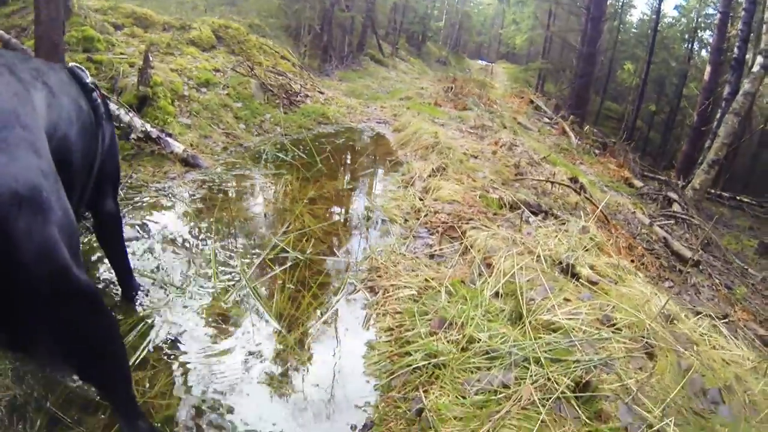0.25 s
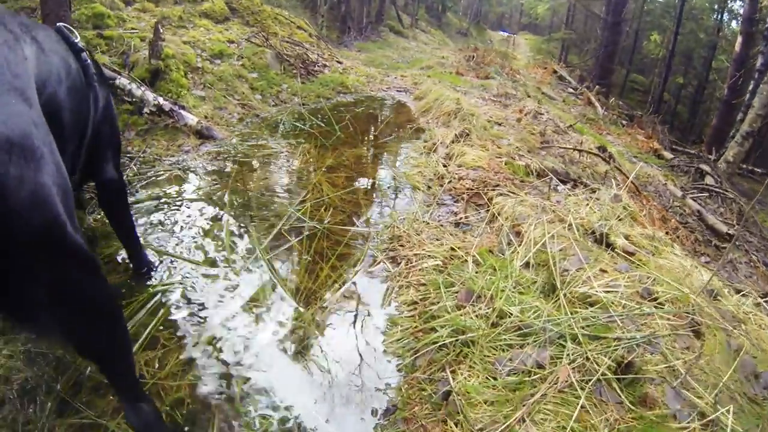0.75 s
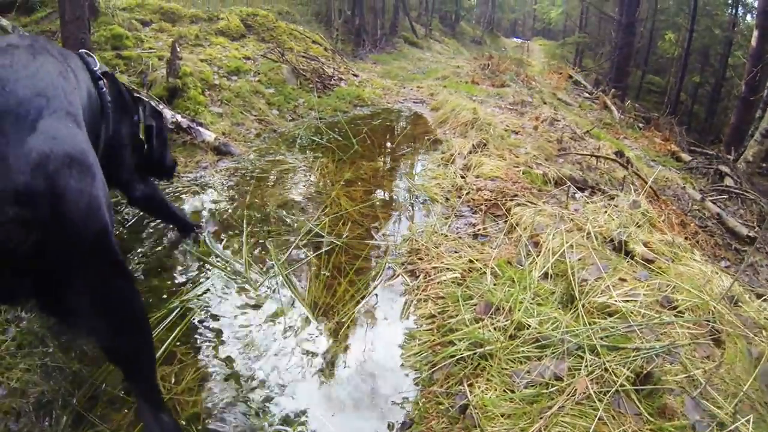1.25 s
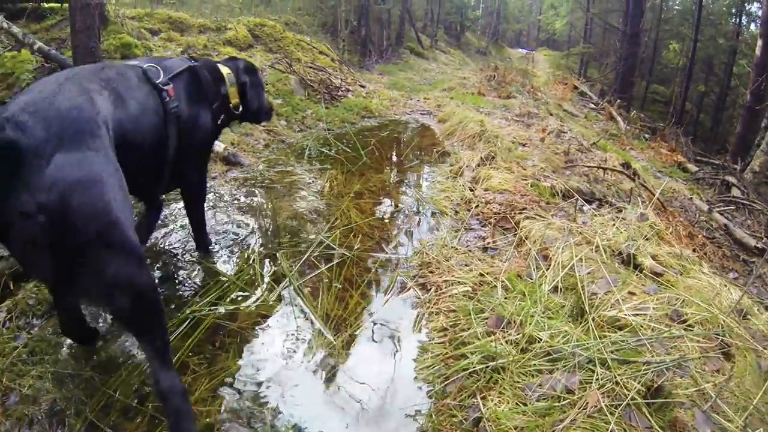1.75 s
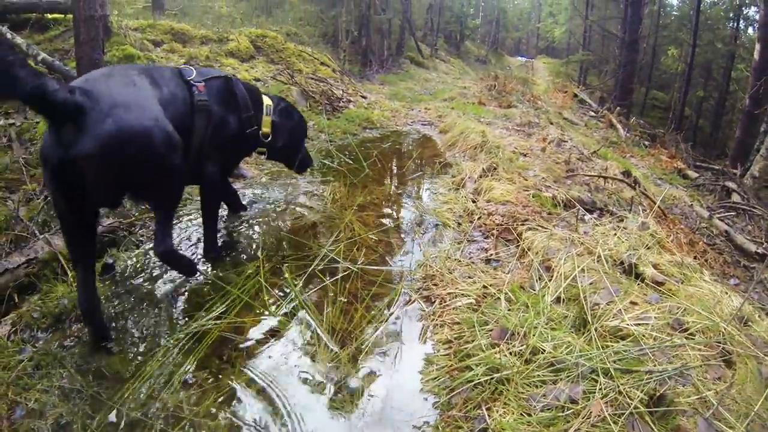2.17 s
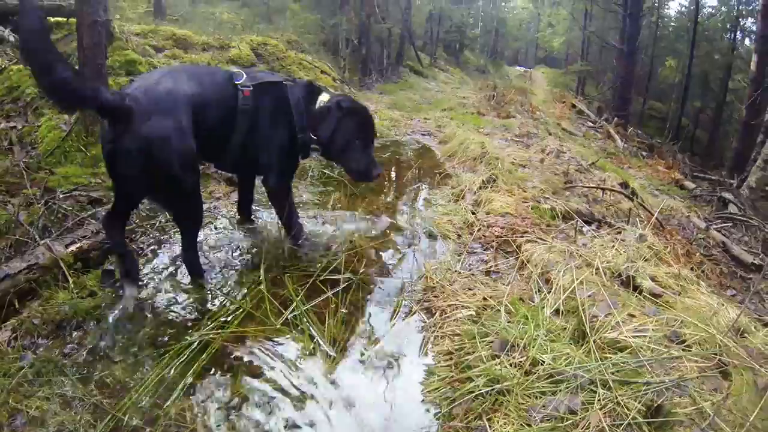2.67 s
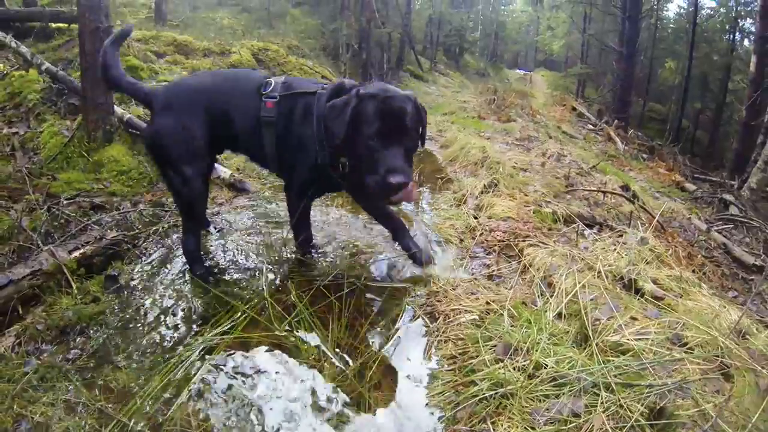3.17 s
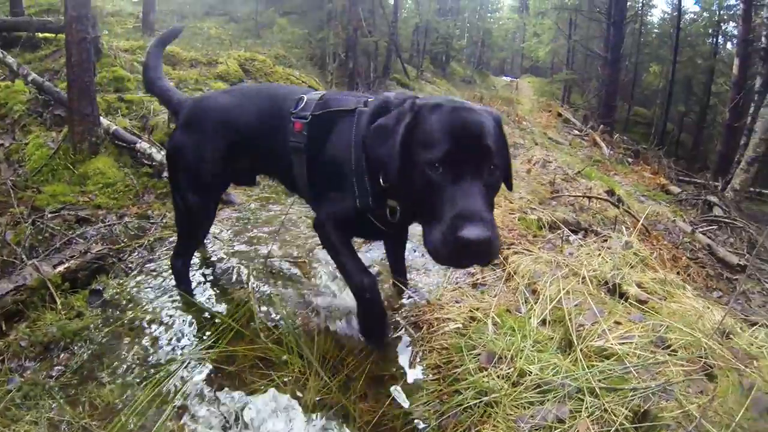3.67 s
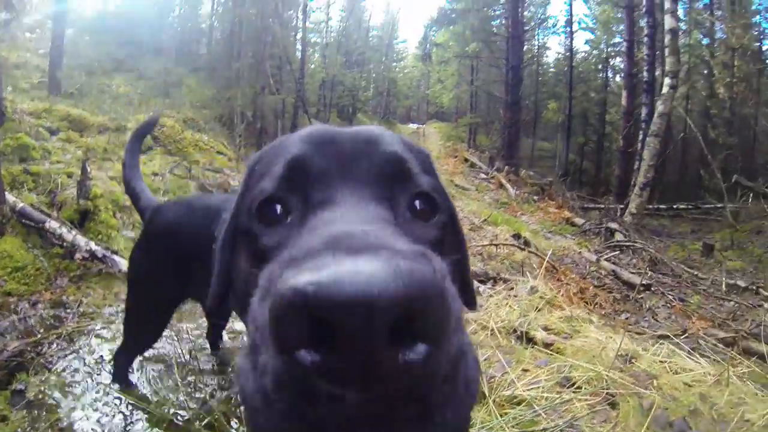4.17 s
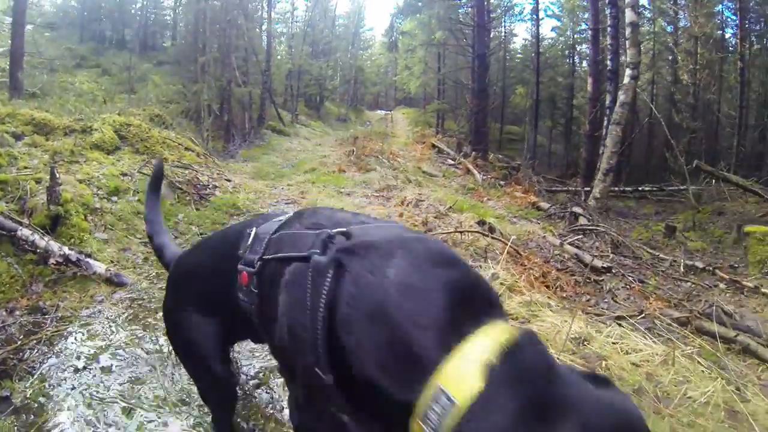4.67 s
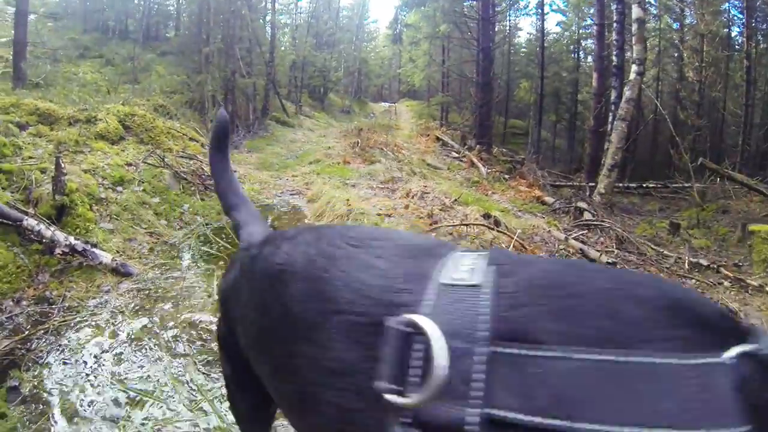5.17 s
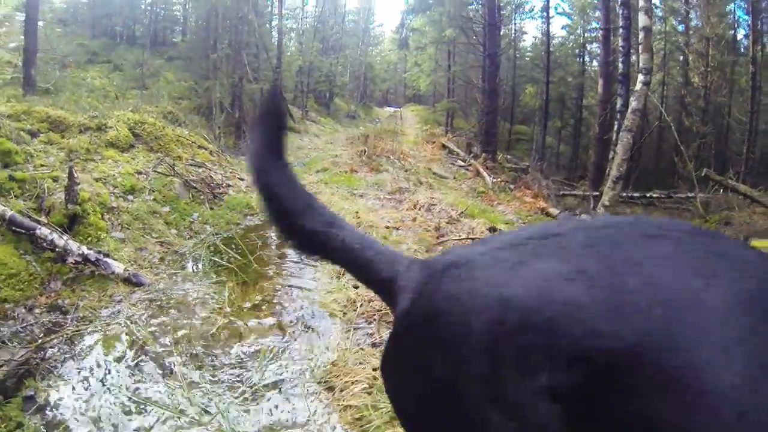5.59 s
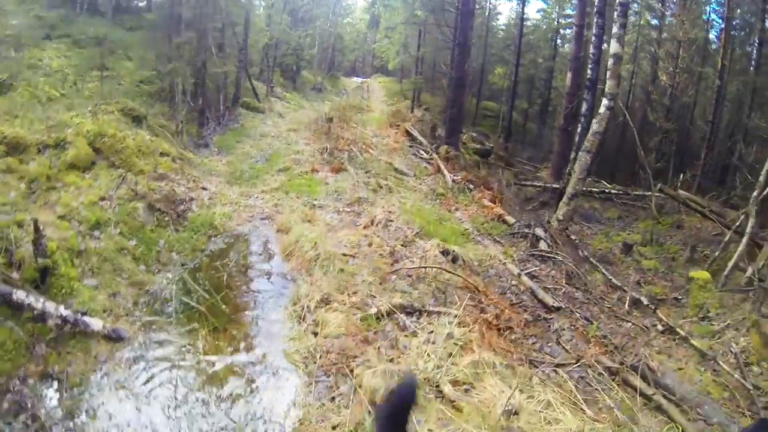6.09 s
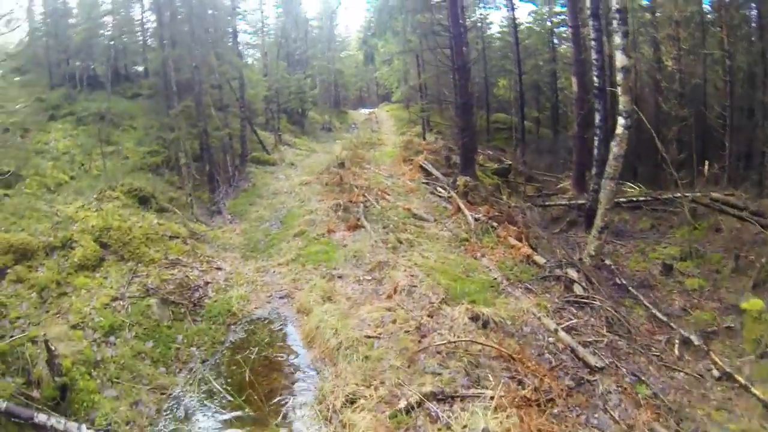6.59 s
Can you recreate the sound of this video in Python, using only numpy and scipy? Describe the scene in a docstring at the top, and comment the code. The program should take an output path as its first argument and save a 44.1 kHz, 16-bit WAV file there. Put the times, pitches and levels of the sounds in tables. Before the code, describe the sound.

Heard from inside a hand-held plastic camera case outdoors among trees: grip rumble and dull bumps open, then paws stir shallow water in irregular, gentle sloshes with gurgles, tinkling drips and brief sprays. Steps continue as the dog comes near and passes, with more case clicks. After a strong plastic snap the water settles, leaving mostly quiet hiss and a faint wavering whine.

```python
"""A dog wades through a shallow forest puddle, heard from inside a hand-held camera's plastic case.
Legs, bubbles and short crackling bursts are made of random drops and ringing bubbles; trees add a faint tail.
Resonances of the case wall colour the slosh. The hand on the grip adds rumble, soft bumps and sharp ticks.
Under it all lie a steady filtered-noise hiss and a thin sine whine whose pitch wavers."""
import sys
import numpy as np
from scipy import signal
from scipy.fft import rfft, irfft, next_fast_len
from scipy.io import wavfile
from scipy.ndimage import map_coordinates

SR = 44100
rng = np.random.default_rng(int(sys.argv[2]) if len(sys.argv) > 2 else 0)


def to_wav(s):
    """Save 16-bit WAV."""
    ch = np.atleast_2d(s).T  # columns
    pcm = np.round(np.clip(ch, -1, 1) * 32767)  # PCM
    wavfile.write(sys.argv[1], SR, pcm.astype(np.int16))


N = 302085  # length in samples

# All table levels are relative: the functions below may shift or rescale them.
# the hand shifting on the grip: (time [s], rumble level [dB])
HAND_SHIFTS = [(0.0, -42), (0.31, -52), (0.46, -48), (0.85, -52.5), (1.28, -62.5), (1.48, -51),
               (1.62, -60.5), (2.85, -59), (3.15, -62.5), (3.79, -58), (3.86, -48.5), (4.5, -50.5),
               (4.66, -55.5), (4.8, -51.5), (5.38, -60), (5.6, -52), (6.0, -57), (6.84, -61)]
# large bubbles that the paws trap: (time [s], level [dB], pitch [Hz])
LARGE_BUBBLES = [(0.08, -54, 2800), (0.814, -51.5, 1570), (0.848, -44.5, 1590), (0.8663, -35, 1660),
                 (0.9691, -55.5, 1430), (1.208, -53.5, 1500), (1.245, -51.5, 1416), (1.352, -46, 1527),
                 (1.781, -55.5, 2650), (1.8257, -54.5, 1417), (1.8716, -49.5, 1473), (2.063, -46, 2941),
                 (2.068, -48.5, 2400), (2.08, -47, 1450), (2.1167, -52, 1790), (2.442, -48, 1340),
                 (2.451, -49.5, 1465), (2.4786, -54, 3120), (2.57, -48.5, 1544), (2.595, -51, 1560),
                 (2.6272, -47, 1292), (2.641, -47, 1484), (2.6633, -48, 1550), (2.723, -54.5, 2440),
                 (2.7297, -52, 3460), (2.7885, -53.5, 1530), (3.1392, -57, 1390), (3.244, -55, 3170),
                 (3.6696, -52.5, 1350), (3.85, -44, 1460), (3.8842, -48, 3510), (4.1367, -50, 1460),
                 (4.205, -56, 1518), (4.6028, -49.5, 2330), (4.627, -50, 2590), (4.655, -53, 2870),
                 (4.7024, -59, 2800), (4.7908, -51.5, 1780), (4.846, -43.5, 1445), (4.954, -52.5, 1870),
                 (5.0232, -51.5, 2170), (5.0723, -54, 1480), (5.1616, -52, 2890), (5.558, -46.5, 1406),
                 (5.621, -50, 1491), (5.647, -52.5, 2200)]
# short bursts of spray and sharp crackles: (time [s], level [dB], brightness [dB])
SPRAY_AND_CRACKLES = [(0.082, -50, -37), (0.7846, -53, -28), (0.8228, -45.5, -27), (0.847, -42.5, -42),
                      (0.862, -40, -48), (0.8714, -51, -29), (0.888, -56, -22), (0.915, -52.5, -25),
                      (0.966, -50, -41), (1.353, -49, -28), (1.359, -45, -22), (1.5317, -50, -16),
                      (2.0486, -50.5, -14), (2.0596, -48.5, -12), (2.6195, -50, -17), (2.659, -49.5, -29),
                      (2.9794, -49, -15), (3.321, -48, -18), (3.397, -45, -30), (3.868, -42.5, -11),
                      (3.896, -47.5, -13), (3.9816, -45, -5), (3.997, -50, -13), (4.594, -55, -8),
                      (4.644, -53, -6), (4.7864, -43, -9), (4.868, -50, -16), (5.015, -55, 0),
                      (5.08, -46.5, -20), (5.155, -57, -18), (5.692, -50, -14)]
# soft knocks through the grip: (time [s], level [dB], pitch [Hz], sway of the mount [dB])
SOFT_KNOCKS = [(0.0238, -32.5, 174, -20.5), (0.139, -35, 216, -57), (0.1528, -31, 228, -24),
               (0.385, -26.5, 158, -27), (0.4687, -42.5, 106, -29), (0.6313, -26, 220, -23),
               (0.6784, -29.5, 140, -33), (1.547, -41.5, 164, -54), (1.5612, -38, 163, -44),
               (1.723, -32.5, 178, -33), (2.0187, -33, 183, -30.5), (2.0345, -30, 202, -50),
               (2.05, -28, 205, -28.5), (2.24, -49, 183, -33.5), (2.4277, -35.5, 144, -46),
               (3.3886, -28.5, 178, -58), (3.401, -23.5, 213, -34), (3.418, -26.5, 223, -26.5),
               (3.837, -23.5, 217, -45), (3.866, -35.5, 225, -37), (4.055, -40.5, 169, -33),
               (4.412, -36.5, 185, -40), (4.496, -38, 147, -33), (4.7423, -36.5, 148, -26),
               (4.807, -36.5, 136, -25.5), (4.8458, -37.5, 144, -40.5), (4.9401, -31.5, 203, -22.5),
               (5.0806, -37, 166, -23), (5.0872, -36, 229, -26), (5.1347, -37.5, 146, -30),
               (5.1816, -45, 101, -30), (5.4321, -30.5, 228, -54), (5.44, -35.5, 170, -26.5),
               (5.5136, -33.5, 131, -25.5), (5.5299, -37.5, 250, -54), (5.543, -35.5, 144, -33),
               (5.699, -39.5, 139, -36), (5.7635, -42, 204, -33.5), (6.2008, -39.5, 222, -67),
               (6.3789, -43, 177, -56), (6.6795, -38.5, 120, -37)]
# the case ticks in its mount: (time [s], level [dB], treble [dB], pitch [Hz])
CASE_TICKS = [(0.0245, -48, -4.5, 1570), (0.138, -43.5, -22, 1390), (0.1524, -43, -18, 1350),
              (0.633, -41, -8, 1380), (0.679, -48, -5, 1490), (0.7408, -24, -4, 1470),
              (1.717, -43, -7, 1340), (2.0316, -30.5, -15.5, 1370), (3.386, -36.5, -23, 1360),
              (3.3976, -25, -48, 1350), (3.4015, -25, -5, 1470), (3.417, -50, -16, 1442),
              (3.8342, -42, -11, 1380), (3.866, -31.5, -9.5, 1490), (4.0566, -44.5, -27, 1457),
              (4.1824, -40.5, -12, 1500), (4.3943, -42, -19, 1550), (4.453, -41.5, -23, 1580),
              (4.9388, -44.5, -11, 1544), (5.0853, -42, -10, 1460), (5.43, -36.5, -27, 1515),
              (5.4378, -39.5, -10.5, 1490), (5.505, -50, -19, 1479), (5.5283, -39, -29, 1510),
              (5.5696, -38.5, -11, 1550), (5.707, -36.5, -8.5, 1550), (5.7608, -40, -8, 1540),
              (5.8677, -13, -2.5, 1498), (6.2, -38.5, -13, 1370)]
# tone of the struck case: (frequency [Hz], level [dB])
CASE_TONE = [(60, -46), (350, -17.5), (700, -17.5), (1050, -10.5), (1280, 2), (1550, 1.5), (1950, -6.5),
             (2270, -14), (2750, -10), (3150, -10), (3450, -4.5), (4000, -18.5), (5100, -53), (8200, -38.5),
             (11000, -67)]
# wall resonances that pass the water's sound: (frequency [Hz], width [Hz], level [dB])
WALL_RESONANCES = [(1410, 200, 7), (1567, 148, 6), (2140, 186, -5.5)]
# fizz of stirred water: (frequency [Hz], level per Hz [dB])
FIZZ_TONE = [(900, -31.5), (1800, -2.5), (2300, -4.5), (3200, 3), (4200, -10), (6000, -6), (8000, -8),
             (11000, -26), (15000, -30)]
# fine spray and crackle: (frequency [Hz], level per Hz [dB])
SPLASH_TONE = [(700, -7.5), (1500, -1.5), (2200, -2.5), (3500, -1.5), (5500, 0), (7500, -4), (9000, -9),
               (12000, -14.5), (15000, -14.5)]
# rubbing on the grip: (frequency [Hz], level per Hz [dB])
RUB_TONE = [(10, -3.5), (27, 3), (60, 2.5), (110, -7), (200, -18.5), (350, -26), (700, -31), (2000, -69)]
# the steady hiss: (frequency [Hz], level per Hz [dB])
HISS_TONE = [(120, -32), (200, -2.5), (249, -5.5), (320, -5.5), (391, -7), (698, -10), (1270, -13),
             (1420, -9), (1790, -14.5), (3140, -14.5), (4280, -18.5), (11800, -29.5), (13600, -25),
             (15200, -34)]
# a leg sweeps through the water: (time [s], length [s], slosh level [dB], fizz level [dB])
LEG_STROKES = [(0.057, .46, -69.5, -79), (0.771, .11, -62, -67), (0.888, .07, -68.5, -72),
               (1.189, .07, -64, -75), (1.327, .04, -61, -70), (1.474, .07, -68, -76.5),
               (1.762, .11, -66, -72), (2.037, .10, -64.5, -69), (2.323, .07, -70, -76),
               (2.417, .10, -60.5, -70.5), (2.553, .12, -63.5, -68.5), (2.697, .09, -66.5, -69.5),
               (3.039, .13, -65, -73), (3.223, .11, -64.5, -70), (3.627, .08, -62, -67),
               (3.75, .09, -68, -71), (3.852, .06, -64.5, -62), (3.929, .15, -66, -70.5),
               (4.107, .12, -60.5, -68), (4.271, .24, -68, -72), (4.587, .13, -69, -67),
               (4.759, .12, -65, -70.5), (4.931, .15, -68, -69.5), (5.103, .08, -78.5, -69),
               (5.297, .04, -72.5, -71.5), (5.552, .17, -66, -68), (5.738, .17, -68, -68.5),
               (5.956, .15, -70, -72.5), (6.476, .20, -74, -76.5)]
# a small nudge of the fingers: (frequency [Hz], level per Hz [dB])
NUDGE_TONE = [(10, -3), (30, 0.5), (70, 0.5), (130, -3.5), (220, -12), (380, -26.5), (700, -43.5),
              (2000, -89)]

HISS_DB = -67.5
LOW_HZ, TOP_HZ = 15, 15200  # band limits of the camera
STROKE_ATTACK_S, STROKE_FALL_DB_PER_S = .018, 330
RIPPLE_SLOSH_DB, RIPPLE_FIZZ_DB = -79.5, -83  # the puddle between strokes
BURST_ATTACK_S, BURST_T60_S = 0.0042, 0.039  # T60: time to fall by 60 dB


def amp(db):
    """Turn decibels into gain."""
    return 10 ** (np.asarray(db) / 20)


def unit(x):
    """Scale a sound to an average (rms) strength of 1."""
    return x / np.sqrt(np.mean(x ** 2) + 1e-20)


def along(points, hz):
    """Read a value between (Hz, value) points, spaced by the logarithm of frequency."""
    f, v = np.transpose(points)
    return np.interp(np.log(hz + 1), np.log(f + 1), v)


def wobble(rate):
    """A smooth random curve built from this many random points a second."""
    knots = rng.standard_normal(int(N * rate / SR) + 4)
    return map_coordinates(knots, [np.arange(N) * rate / SR])


def filtered(x, response):
    """Multiply each frequency of x by a response."""
    m = next_fast_len(N + SR // 2)  # spare room keeps the end from wrapping round to the start
    return irfft(rfft(x, m) * response(np.fft.rfftfreq(m, 1 / SR)), m)[:N]


def impulse(db_of, size=4096):
    """A click with the given dB at each frequency, with its energy as early as possible."""
    cepstrum = irfft(np.log(amp(db_of(np.fft.rfftfreq(size, 1 / SR))) + 1e-6))
    # fold the time-reversed half forward, so that nothing sounds before the click
    cepstrum[1:size // 2] *= 2
    cepstrum[size // 2 + 1:] = 0
    return irfft(np.exp(rfft(cepstrum)))


def coloured(x, spectrum):
    """Give x a tone colour with a filter that keeps the power of white noise."""
    h = impulse(lambda hz: along(spectrum, hz))
    return signal.fftconvolve(x, h / np.linalg.norm(h))[:N]


def add(track, s, sound):
    """Mix a sound into the track at time s."""
    i = max(0, round(s * SR))
    track[i:i + len(sound)] += sound[:max(0, N - i)]


def droplets(rate, spread_db):
    """Random clicks, about rate a second, many small and a few large, scaled to rms 1."""
    size = amp(spread_db * np.minimum(rng.exponential(size=N), 4))
    hits = rng.random(N) < rate / SR
    return unit(hits * size * rng.choice([-1, 1], N))


def wall(x):
    """Pass x through the case wall, which rings at its resonances."""
    def response(f):
        total = 0
        for k, (centre, width, db) in enumerate(WALL_RESONANCES):
            band = 1j * f * width / (centre * centre - f * f + 1j * f * width)
            total = total + (-1) ** k * amp(db) * band  # neighbours have opposite signs
        return total
    return filtered(x, response)


def bubble(t, hz, cycles, rise, attack):
    """A trapped bubble rings, falling 60 dB in some cycles; its pitch rises as it nears the surface."""
    age = t * hz / cycles
    phase = 2 * np.pi * hz * t * (1 + rise * (np.minimum(age, 1) - .3))
    return np.sin(phase) * amp(-60 * age) * (1 - np.exp(-t / attack))


def trickle(flow_db, count, centre_hz, spread, cycles, rise=0.22, size_db=4.5, attack=0.00021):
    """Scatter many small bubbles; livelier water makes more and louder ones."""
    flow = amp(flow_db)
    out, t = np.zeros(N), np.arange(SR // 25) / SR
    # strong flow takes up more of the running total, so more random picks land there
    when = np.minimum(np.searchsorted(np.cumsum(flow) / flow.sum(), rng.random(count)), N - 1)
    for i, (pitch, life, size) in zip(when, np.clip(rng.standard_normal((count, 3)), -2, 2)):
        hz = centre_hz * np.exp(spread * pitch)
        gain = flow[i] * amp(size_db * size + .5 * along(FIZZ_TONE, hz))
        add(out, i / SR, gain * bubble(t, hz, cycles * np.exp(0.23 * life), rise, attack))
    return out


def stirring():
    """Slosh and fizz in dB: each stroke swells, holds while the leg moves, and settles into ripples."""
    age = np.arange(SR) / SR
    power = np.outer(amp([RIPPLE_SLOSH_DB, RIPPLE_FIZZ_DB]) ** 2, np.ones(N))
    for s, length, slosh_db, fizz_db in LEG_STROKES:
        fall = amp(-STROKE_FALL_DB_PER_S * np.maximum(age - length, 0))
        shape = np.minimum(age / STROKE_ATTACK_S, 1) * fall
        add(power[0], s, (amp(slosh_db) * shape) ** 2)
        add(power[1], s, (amp(fizz_db) * shape) ** 2)
    return 10 * np.log10(power)


def wash(slosh_db=-5, fizz_db=-8.5, lap_db=4, gurgle_db=15.0, tinkle_db=7, drip_db=5.0):
    """Legs stir the water: lapping tiny drops, lower gurgles, high tinkling bubbles and drips off the fur."""
    slosh, fizz = stirring()
    laps = lap_db * wobble(35)
    body = amp(slosh + slosh_db + laps) * unit(wall(droplets(rate=900, spread_db=4.5)))
    top = amp(fizz + fizz_db + laps) * unit(coloured(droplets(rate=4000, spread_db=10.5), FIZZ_TONE))
    gurgle = trickle(slosh + gurgle_db, count=250, centre_hz=1490, spread=0.061, cycles=27,
                     rise=0.12, attack=0.0018)
    tinkle = trickle(fizz + tinkle_db, count=1000, centre_hz=3305, spread=0.45, cycles=49, rise=0.1)
    drips = trickle(fizz + drip_db, count=85, centre_hz=2780, spread=0.207, cycles=68,
                    rise=0.088, size_db=5.0)
    return body + top + gurgle + tinkle + drips


def forest(x, t60=0.49, level_db=-19):
    """Tree trunks scatter the sound into a faint tail of fading noise."""
    t = np.arange(SR // 2) / SR
    tail = rng.standard_normal(len(t)) * amp(-60 * t / t60) * (1 - np.exp(-t / 0.0074))
    return amp(level_db) * signal.fftconvolve(x, tail / np.linalg.norm(tail))[:N]


def rumble(level_db=-4.5, lump_db=3.0, nudge_db=-6.5):
    """The hand rubs on the grip as unsteady low noise, with small random nudges mixed in."""
    times, levels = np.transpose(HAND_SHIFTS)
    hand_db = np.interp(np.arange(N) / SR, times, levels)
    lumps = lump_db * np.tanh(wobble(24))
    rub = amp(level_db + lumps) * unit(coloured(rng.standard_normal(N), RUB_TONE))
    nudges = amp(nudge_db) * unit(coloured(droplets(rate=24, spread_db=3.5), NUDGE_TONE))
    return amp(hand_db) * (rub + nudges)


def floor(whine_hz=13625, whine_db=-87):
    """Steady hiss from filtered noise, and the camera's thin whine with a wavering pitch."""
    pitch = whine_hz + 12 * wobble(40)
    whine = np.sin(2 * np.pi * np.cumsum(pitch) / SR)
    hiss = unit(coloured(rng.standard_normal(N), HISS_TONE))
    return amp(HISS_DB) * hiss + amp(whine_db) * whine


def lead_in(level_db=-56, rise_s=0.0044):
    """A faint noise swells for a few milliseconds before each tick."""
    out, lead = np.zeros(N), 1 / 50  # lead in seconds
    t = np.arange(round(lead * SR)) / SR - lead
    for s, *_ in CASE_TICKS:
        add(out, s - lead, np.exp(t / rise_s))
    return amp(level_db) * out * unit(wall(droplets(rate=2500, spread_db=7.5)))


def bumps(push_db=1, sway_db=2, sway_hz=42, sway_t60=0.077, width=0.17, rebound=0.42):
    """A soft knock pushes the case in, it springs back, and the mount sways."""
    out, lead = np.zeros(N), 1 / 100  # lead in seconds: the push starts before its peak
    t = np.arange(SR // 4) / SR - lead
    after = np.maximum(t, 0)
    variations = rng.standard_normal((len(SOFT_KNOCKS), 2))
    for (s, db, hz, mount_db), (side, stiff) in zip(SOFT_KNOCKS, variations):
        u = t * hz / width  # a higher pitch makes a shorter push
        push = (1 + (u / 2) ** 2) ** -3 - rebound * np.exp(-((u - 2.6) / 2.27) ** 2)
        swing = np.sin(2 * np.pi * sway_hz * np.exp(0.33 * stiff) * after)
        sway = swing * amp(-60 * after / sway_t60) * (1 - np.exp(-after / 0.011))
        knock = amp(db + push_db) * push - amp(mount_db + sway_db) * sway
        add(out, s - lead, np.sign(side) * knock)
    return out


def ticks(level_db=27, ring_db=-39, ring_hz=3295, ring_t60=0.16, case_hz=1480):
    """Plastic slips on plastic as a click; level and treble together set how loud its thin ring is."""
    out, t = np.zeros(N), np.arange(SR // 4) / SR
    softness = [(1900, 0), (2800, 1.2), (4200, 5.5), (7000, 15.0)]  # (frequency [Hz], share of treble dB)
    tones = np.sin(2 * np.pi * ring_hz * t) + .3 * np.sin(2 * np.pi * 3106 * t)
    ring = tones * amp(ring_db - 60 * t / ring_t60)
    for s, db, treble_db, pitch in CASE_TICKS:
        # pitch / case_hz slides the whole tone of the case up or down
        colour = lambda hz: along(CASE_TONE, hz * case_hz / pitch) + (treble_db + 3.5) * along(softness, hz)
        add(out, s, amp(db + level_db) * impulse(colour))
        add(out, s, amp(db + treble_db) * ring)
    return out


def plops(level_db=9.0, cycles=35, rise=0.061, smear=0.24):
    """The larger bubbles ring, each with a short churn of water drops around it."""
    out, churn, t = np.zeros(N), np.zeros(N), np.arange(SR // 10) / SR
    for (s, db, hz), life in zip(LARGE_BUBBLES, rng.standard_normal(len(LARGE_BUBBLES))):
        ring = bubble(t, hz, cycles * np.exp(0.27 * life), rise, attack=0.0014)
        add(out, s - .0005, amp(db + level_db) * ring)
        add(churn, s - .005, amp(db - 60 * t / 0.071) * (1 - np.exp(-t / 0.0016)))
    drops = droplets(rate=2500, spread_db=2.5)
    water = unit(unit(wall(drops)) + 0.25 * coloured(drops, FIZZ_TONE))
    return out + smear * churn * water


def spray_and_crackles(level_db=0.8, tilt=1.0, patchy_db=4):
    """Short bursts of spray and sharp crackles: clouds of clicks, each with its own random tone colour."""
    out, t = np.zeros(N), np.arange(SR // 6) / SR
    patter = droplets(rate=5100, spread_db=4.0)
    swell = 1 - np.exp(-t / BURST_ATTACK_S)
    bands = np.geomspace(1000, 15000, num=24)  # Hz
    variations = rng.standard_normal((len(SPRAY_AND_CRACKLES), len(bands)))
    for (s, db, bright_db), patches in zip(SPRAY_AND_CRACKLES, variations):
        # brightness acts mostly on the treble
        brightness = lambda hz: tilt * (bright_db + 8) * along([(3500, 0.12), (8000, 0.88)], hz)
        patchy = lambda hz: patchy_db * np.interp(hz, bands, patches)
        h = impulse(lambda hz: along(SPLASH_TONE, hz) + brightness(hz) + patchy(hz))
        cloud = patter[round(s * SR):][:len(t)] * amp(-60 * t / BURST_T60_S) * swell
        add(out, s, amp(db + level_db) * signal.fftconvolve(cloud, h / np.linalg.norm(h)))
    return out


def scene():
    """Mix the water and crackles among the trees, the sounds of the case, and the steady floor."""
    among_trees = wash() + plops() + spray_and_crackles()
    case = bumps() + lead_in() + ticks() + rumble()
    return (among_trees + forest(among_trees) + case + floor())[None]


def record(dry):
    """The camera gently weakens the deepest bass and cuts everything from its top limit up."""
    return filtered(dry[0], lambda hz: 1j * hz / (LOW_HZ + 1j * hz) * (hz < TOP_HZ))[None]


dry = scene()
out = record(dry)
to_wav(out)
```